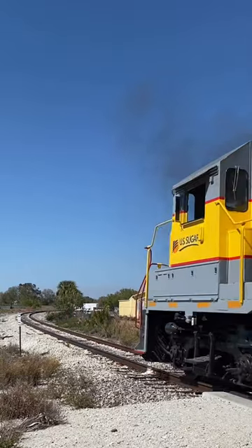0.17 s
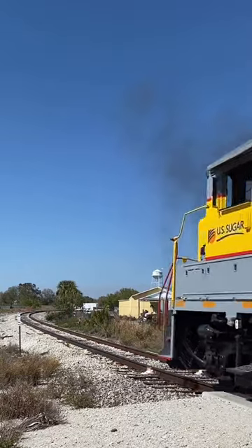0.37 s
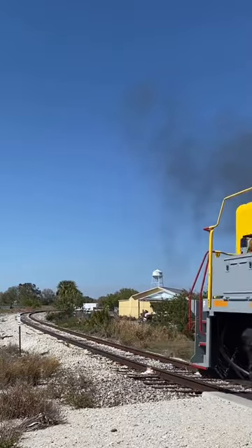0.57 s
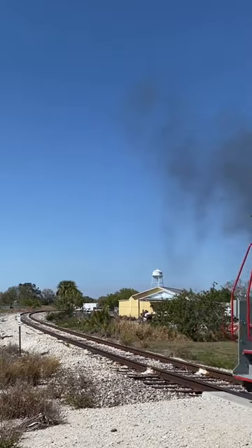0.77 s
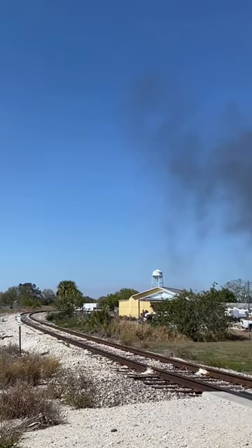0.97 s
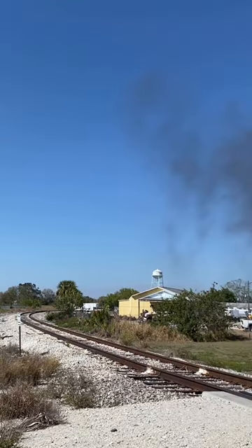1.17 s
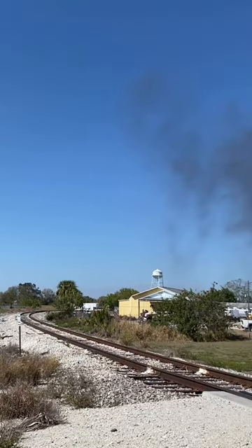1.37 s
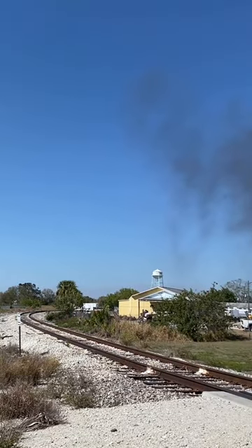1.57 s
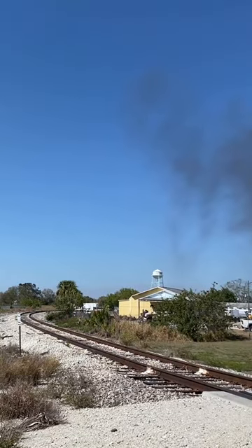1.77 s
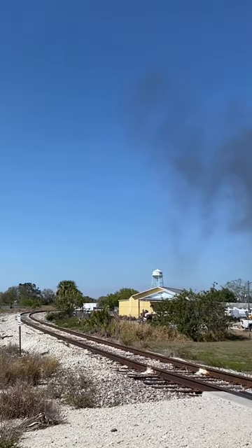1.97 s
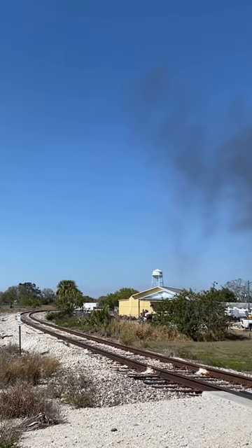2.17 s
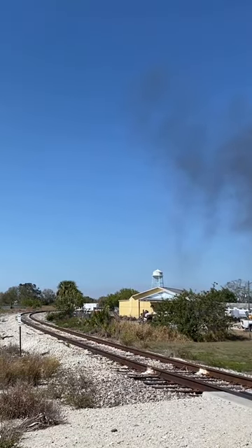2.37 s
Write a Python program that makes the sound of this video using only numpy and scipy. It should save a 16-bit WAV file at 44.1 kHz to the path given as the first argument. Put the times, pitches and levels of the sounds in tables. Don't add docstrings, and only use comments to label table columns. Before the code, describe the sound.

A diesel locomotive rolls past close to a handheld phone outdoors, deep uneven engine throb with wheel clatter, fan hiss and dull thuds; a brief air spit early, thin flange squeals, then everything recedes.

```python
import sys
import numpy as np
from scipy import signal
from scipy.fft import rfft, irfft, next_fast_len
from scipy.io import wavfile
from scipy.ndimage import uniform_filter1d

SR = 44100
rng = np.random.default_rng(int(sys.argv[2]) if len(sys.argv) > 2 else 0)


def waveform_to_disk(signal):
    frames = np.transpose(np.atleast_2d(signal))
    scaled = np.clip(frames, -1, 1) * 32767
    samples = np.round(scaled).astype(np.int16)
    wavfile.write(sys.argv[1], SR, samples)


def voltage_ratio(level):
    return 10 ** (np.asarray(level, float) / 20)


N = 111573
T = np.arange(N) / SR


def evened(x):
    return x / np.sqrt(np.mean(x ** 2) + 1e-20)


def read(points, hz):
    f, value = np.transpose(points)
    return np.interp(np.log(hz + 1), np.log(f + 1), value)


def drift(top_hz, count=1):
    size = next_fast_len(N)
    spectrum = rfft(rng.standard_normal((count, size)))
    spectrum /= 1 + (np.fft.rfftfreq(size, 1 / SR) / top_hz) ** 4
    spectrum[:, 0] = 0
    slow = irfft(spectrum, size)[:, :N]
    return slow / slow.std(1, keepdims=True)


def noise(shape, patchy_db, flicker_db, size=512):
    frames = 4 * N // size + 5
    hz = np.fft.rfftfreq(size, 1 / SR)
    real, imag, patches = rng.standard_normal((frames, len(hz), 3)).T
    patches = uniform_filter1d(patches, size=8, axis=0)
    patches = evened(uniform_filter1d(patches, size=14, axis=1))
    flicker = evened(uniform_filter1d(rng.standard_normal(frames), size=5))
    colour_db = read(shape, hz) - 60 * (hz < shape[0][0])
    gain = voltage_ratio(colour_db[:, None] + patchy_db * patches + flicker_db * flicker)
    sound = signal.istft((real + 1j * imag) * gain, nperseg=size, noverlap=3 * size // 4)[1]
    return evened(sound[:N])


def resonate(x, hz, width):
    turn = np.exp(2j * np.pi * hz * T)
    r = np.exp(-np.pi * width / SR)
    return 2 * (turn * signal.lfilter([1 - r], [1, -r], x / turn)).real


# (time [s], distance [m])
DISTANCE_M = [(0, 10.74), (.5, 10.85), (1, 10.97), (1.5, 14), (2, 22.6), (2.53, 34.4)]


def spread_db(t):
    return -20 * np.log10(np.interp(t, *np.transpose(DISTANCE_M)) / 10)


# (time [s], rumble lift [dB], clatter lift [dB], length [s])
WHEEL_THUDS = [(0.081, 8.5, 5.5, 0.016), (0.152, 1, 5.5, 0.098), (0.39, 1, 5.5, 0.032),
               (0.509, 7, 8, 0.026), (0.566, 3, 3, 0.024), (0.69, 2, 1.5, 0.15), (0.938, 5.5, 2.5, 0.032),
               (1.094, 3, 2, 0.047), (1.365, 7.5, 2, 0.024), (1.773, 7, 1.5, 0.035),
               (1.994, -2, 3.5, 0.012), (2.168, 7.5, 0.5, 0.063)]


def thud_db(column):
    return sum(row[column] * np.exp(-((T - row[0]) / row[3]) ** 2) for row in WHEEL_THUDS)


# (frequency [Hz], level [dB])
CLATTER_COLOUR = [(300, 6.5), (600, 4.5), (1000, 3), (1500, -0.5), (2500, -2.5), (3500, -6), (5000, -31)]
# (frequency [Hz], level [dB])
HISS_COLOUR = [(1000, -8.5), (2500, -1), (4000, -3.5), (5500, -3), (7000, 0), (9000, -8.5), (12000, -15),
               (13300, -13.5)]


def running_gear():
    lift_db = thud_db(column=2)
    last_fade_db = -2.3 * np.clip((T - 2.2) / 0.24, 0, 1)
    clatter_db = -29 + 2.4 * spread_db(T) + last_fade_db + 1.06 * lift_db
    clatter = noise(CLATTER_COLOUR, patchy_db=2.5, flicker_db=1.05) * voltage_ratio(clatter_db)
    hood_db = -3.5 * np.exp(-((T - .46) / 0.27) ** 4)
    hiss_db = -33 + 0.58 * spread_db(T) + hood_db + 1.17 * lift_db
    hiss = noise(HISS_COLOUR, patchy_db=2.2, flicker_db=0.67) * voltage_ratio(hiss_db)
    return clatter + hiss


# (frequency [Hz], level [dB])
WHEEL_OVERTONES = [(7870, -71), (8300, -59), (8640, -51), (9180, -67), (9250, -76), (9670, -69),
                   (10230, -56), (11200, -67), (11400, -64), (11500, -60), (11930, -63), (2282, -51.5),
                   (2408, -53.5), (2745, -53)]


def overtones():
    rub_from_s, flicker_db = 0.61, 6
    rub = rng.standard_normal(N)
    flicker = drift(4.4, count=len(WHEEL_OVERTONES))
    rings = np.zeros(N)
    for (hz, db), g in zip(WHEEL_OVERTONES, flicker):
        rings += voltage_ratio(db + flicker_db * np.minimum(g, 1.5)) * evened(resonate(rub, hz, 29))
    rub_db = -5 * (1.0 - .5 * np.tanh((T - rub_from_s) / 0.022))
    return rings * voltage_ratio(rub_db + 0.6 * spread_db(T))


def valve():
    rise_s, fall_s, from_hz, to_hz = .0017, .003, 5750, 5100
    u = T - .2382
    shape = np.where(u < 0, np.exp(-(u / rise_s) ** 2), np.exp(-np.abs(u) / fall_s))
    hz = to_hz + (from_hz - to_hz) * np.clip(.6 - u / 0.0073, 0, 1)
    whistle = shape * np.sin(2 * np.pi * np.cumsum(hz) / SR)
    air_colour = [(4000, -20), (5500, 0), (7000, -5), (9000, 0), (11000, -2), (13000, -10)]
    air = noise(air_colour, patchy_db=0, flicker_db=0)
    puff = np.exp(-((u - .001) / 0.0046) ** 4)
    return voltage_ratio(-14) * whistle + voltage_ratio(-23) * puff * air


MODE_HZ = [2742, 2865, 3297, 3505, 4134, 4190, 5040, 5120, 5270, 5938, 8576, 10224, 745, 434, 272, 200, 108,
           937, 367, 650]
# (mode number, start [s], end [s], level [dB])
FLANGE_SQUEALS = [(8, .04, .205, -42), (1, .09, .2, -39), (2, .47, .55, -33), (0, .5, .61, -40),
                  (1, .63, .72, -42), (2, .73, .8, -42), (2, .77, .91, -36), (2, .92, 1.0, -42),
                  (5, .74, .86, -43), (3, .82, .91, -42), (0, .82, .93, -43), (0, .9, .98, -38),
                  (0, 1.0, 1.15, -43), (0, 1.3, 1.6, -49), (1, .88, .97, -42), (6, .73, .83, -47),
                  (6, .8, .96, -42), (6, .93, 1.04, -36), (6, 1.01, 1.16, -42), (6, 1.13, 1.21, -49),
                  (6, 1.18, 1.28, -39), (6, 1.25, 1.42, -43), (6, 1.39, 1.7, -46), (6, 1.67, 1.87, -44),
                  (6, 1.84, 1.98, -41), (6, 1.95, 2.34, -42.5), (6, 2.31, 2.4, -47), (7, 1.5, 1.62, -50),
                  (7, 1.84, 2.06, -46), (7, 2.08, 2.32, -49), (9, .88, 1.13, -47), (9, 1.55, 1.66, -47),
                  (9, 1.67, 1.87, -45.5), (9, 1.97, 2.18, -46.5), (9, 2.15, 2.38, -50), (5, .9, 1.38, -51),
                  (4, 1.6, 2.0, -52), (4, 1.97, 2.56, -49), (11, 1.2, 1.55, -52), (11, 1.62, 1.85, -52)]
# (mode number, start [s], end [s], level [dB])
FRAME_GROANS = [(12, 1.27, 1.37, -33), (14, .055, .125, -15.5), (14, .47, .62, -24), (14, .9, 1.09, -23),
                (14, 1.24, 1.55, -24), (16, -.03, .24, -20), (15, 1.05, 1.15, -23), (15, 1.19, 1.4, -25),
                (15, 1.72, 1.82, -26), (15, 1.88, 2.06, -30), (13, .86, 1.0, -28), (13, 1.74, 1.88, -29),
                (13, 1.86, 1.97, -36), (18, .9, 1.1, -29), (18, 1.3, 1.4, -30), (17, -.03, .17, -37),
                (17, .22, .31, -35), (17, .38, .56, -38), (19, .78, .88, -34)]


def flanges():
    slip_db, rim_db, edge_s = 1.5, 3.5, .03
    slip = drift(30, count=len(MODE_HZ))
    waver = drift(7.77, count=len(MODE_HZ))
    rub = rng.standard_normal(N)
    level = np.zeros((len(MODE_HZ), N))
    for mode, start, end, db in FLANGE_SQUEALS + FRAME_GROANS:
        level[round(mode)] += voltage_ratio(db) * np.clip(np.minimum(T - start, end - T) / edge_s, 0, 1)
    out = np.zeros(N)
    for hz, gain, g, w in zip(MODE_HZ, level, slip, waver):
        waver_hz = 2.5 * (1 + hz / 5000) * w
        tone = np.sin(2 * np.pi * np.cumsum(hz + waver_hz) / SR)
        fuzz = .3 * evened(resonate(rub, hz, 18 + 40 * hz / 5000))
        lift_db = rim_db * min(hz / 3000, 1) + slip_db * np.minimum(g, 1)
        out += gain * voltage_ratio(lift_db) * (tone + fuzz)
    return out


# (frequency [Hz], level [dB])
ROAR_COLOUR = [(18, -33), (30, -14), (86, 0.5), (162, -6), (273, -8), (317, -15.5), (367, -14),
               (805, -26.5), (1500, -32.5), (1950, -39), (3300, -120)]
# (frequency [Hz], width [Hz], level [dB])
BODY_PANELS = [(108.9, 24, -26), (204.1, 40, -29), (267.6, 41, -30.5), (364, 26, -35.5), (436.3, 18.7, -38),
               (950.4, 16, -45.5)]


def body():
    drive = rng.standard_normal(N)
    panels = np.zeros(N)
    for hz, width, db in BODY_PANELS:
        panels += voltage_ratio(db) * evened(resonate(resonate(drive, hz, width), hz, width))
    roar = panels + voltage_ratio(-18.5) * noise(ROAR_COLOUR, patchy_db=1.0, flicker_db=2.0, size=2048)
    deep = signal.sosfiltfilt(signal.butter(2, 169, fs=SR, output="sos"), roar)
    lift_db = thud_db(column=1)
    jolted = deep * voltage_ratio(0.088 * lift_db) + (roar - deep) * voltage_ratio(lift_db)
    return jolted * voltage_ratio(1.14 * spread_db(T))


# (time [s], rate [cycles/s])
ENGINE_CYCLE = [(0, 5.26), (.8, 5.19), (1.4, 5.14), (2.53, 5.11)]
# (multiple of the cycle [count], level alongside [dB], level from behind [dB])
EXHAUST_ORDERS = [(8, -30, -35.5), (9, -33.5, -33.5), (10, -34, -43), (13, -35, -34), (14, -29, -26.5),
                  (15, -33.5, -22.5), (16, -44, -26.5), (17, -28.5, -25), (18, -44, -32), (19, -26.5, -82),
                  (20, -36, -29), (21, -32.5, -34.5), (23, -46, -30.5)]


def exhaust():
    loud_cylinder_s, behind_s, turn_s = 1.83, 0.85, 0.33
    wander_db, near_wander_rad, far_wander_rad = 1.5, 1.2, .3
    turns = np.cumsum(np.interp(T, *np.transpose(ENGINE_CYCLE))) / SR
    turns = turns - np.interp(loud_cylinder_s, T, turns)
    behind = .5 + .5 * np.tanh((T - behind_s) / turn_s)
    wander_rad = near_wander_rad + (far_wander_rad - near_wander_rad) * behind
    level = drift(1.0, count=len(EXHAUST_ORDERS))
    phase = drift(3.4, count=len(EXHAUST_ORDERS))
    out = np.zeros(N)
    for (order, side_db, rear_db), g, p in zip(EXHAUST_ORDERS, level, phase):
        k = round(order)
        db = side_db + (rear_db - side_db) * behind + wander_db * g + 0.24 * spread_db(T)
        pipe_rad = .15 * (k - 15) ** 2
        out += np.sqrt(2) * voltage_ratio(db) * np.cos(2 * np.pi * k * turns + pipe_rad + wander_rad * p)
    return out


def scene():
    shared = overtones() + valve() + flanges() + exhaust()
    tail = rng.standard_normal(2048) * np.exp(-np.arange(2048) / SR / 0.0077)
    scatter = rfft(tail, N)
    smeared = irfft(rfft(shared) * scatter / abs(scatter), N)
    direct = shared + body() + running_gear()
    scattered = smeared + body() + running_gear()
    return np.array([direct, scattered])


def roll_off(x):
    return signal.sosfilt(signal.butter(12, 13270, fs=SR, output="sos"), x)


# (frequency [Hz], likeness [0-1])
PORT_LIKENESS = [(250, .99), (500, .92), (900, .84), (1450, .45), (2100, .955), (3700, .965), (5800, .75),
                 (7400, .88), (9000, .6), (13000, .55)]
# (frequency [Hz], phase [rad])
PORT_LEAD_LOW = [(130, 0), (350, -.35), (900, -1.3), (1500, -.7), (2200, 0)]
# (frequency [Hz], phase [rad])
PORT_LEAD_HIGH = [(5500, .1), (6500, 3.0), (8200, 3.3), (9600, 6.2), (11200, 6.3), (12700, 9.3)]
# (frequency [Hz], level [dB])
PORT_TILT = [(110, 0), (360, 1.5), (560, 0), (1040, -3.5), (1700, -.3), (2130, .8), (3000, 0)]


def record(dry):
    ceiling, edge_hz = 1.3, 13300
    hz = np.fft.rfftfreq(N, 1 / SR)
    bass = np.minimum(hz / PORT_LIKENESS[0][0], 1) ** 3
    same = 1 - (1 - read(PORT_LIKENESS, hz)) * bass
    lead = read(PORT_LEAD_LOW, hz) + read(PORT_LEAD_HIGH, hz) * (hz > 4000)
    side = np.array([[1], [-1]])
    direct, scattered = rfft(dry)
    ports = np.sqrt((1 + same) / 2) * direct + side * np.sqrt((1 - same) / 2) * scattered
    ports = ports * np.exp(.5j * side * lead) * voltage_ratio(.5 * side * read(PORT_TILT, hz))
    heard = irfft(ports * (hz < edge_hz), N)
    return roll_off(ceiling * np.tanh(heard / ceiling))


dry = scene()
out = record(dry)
waveform_to_disk(out)
```